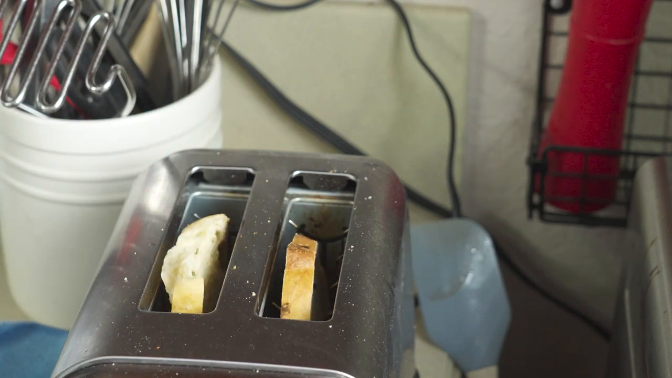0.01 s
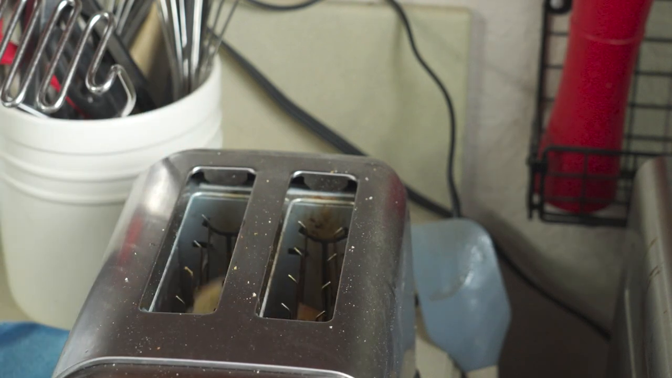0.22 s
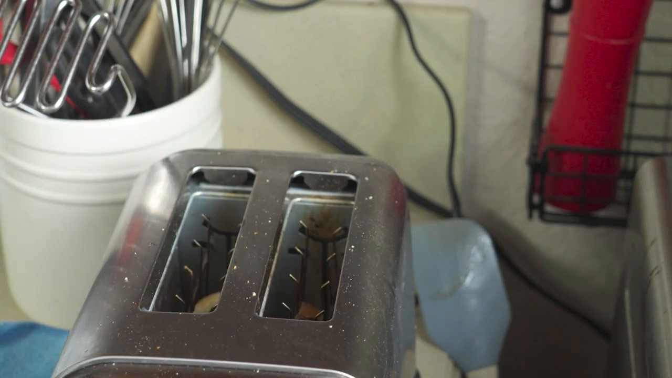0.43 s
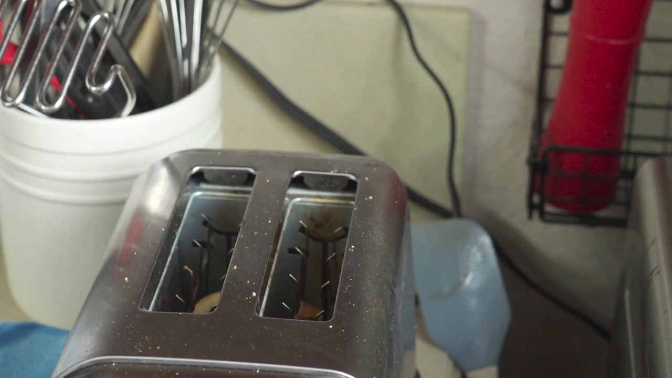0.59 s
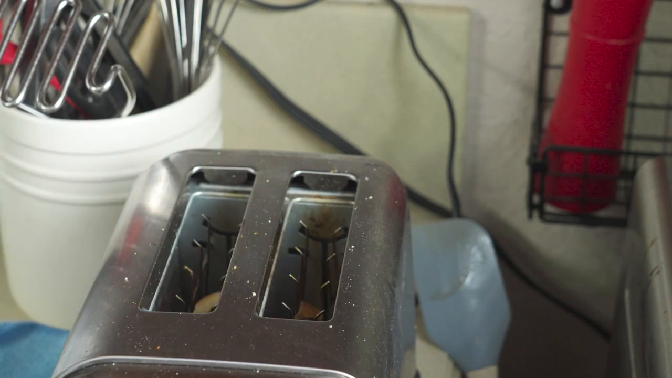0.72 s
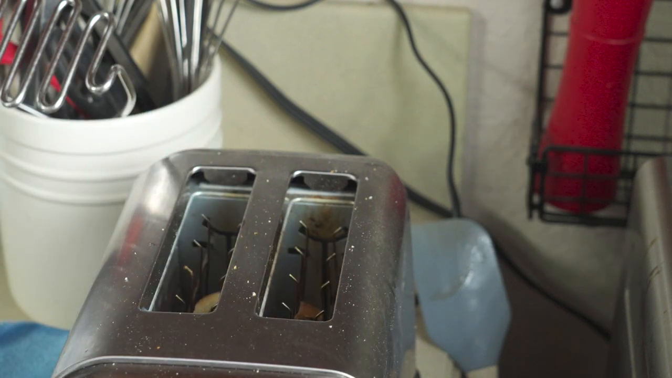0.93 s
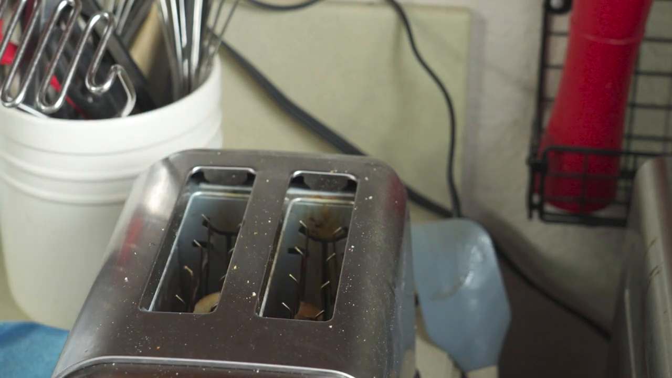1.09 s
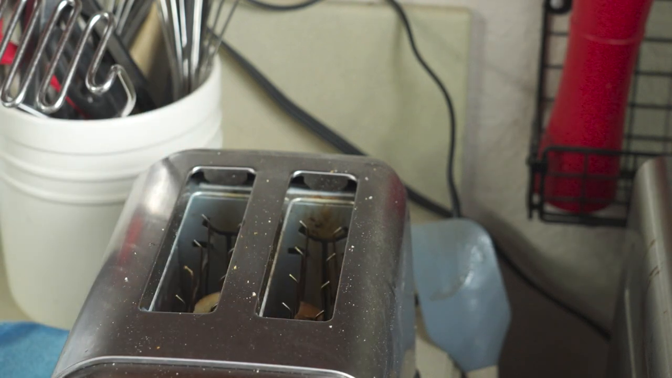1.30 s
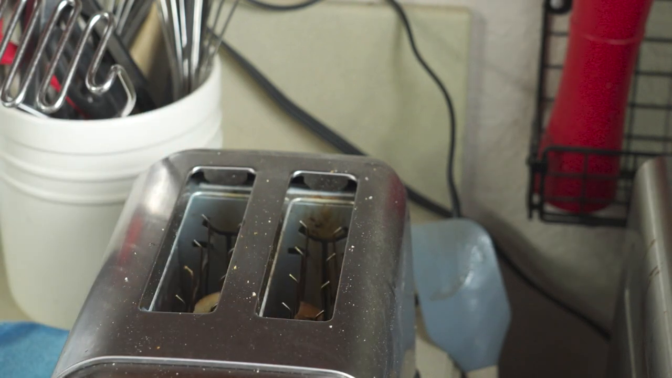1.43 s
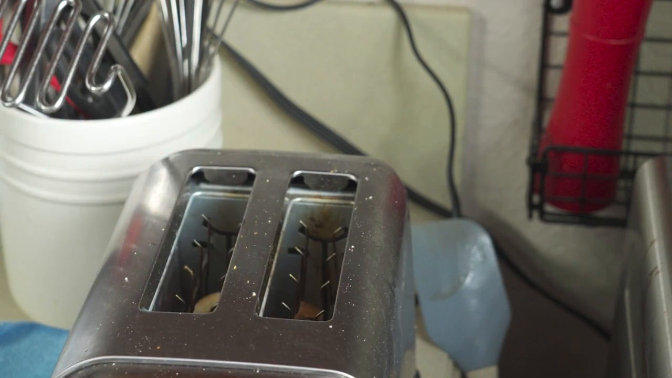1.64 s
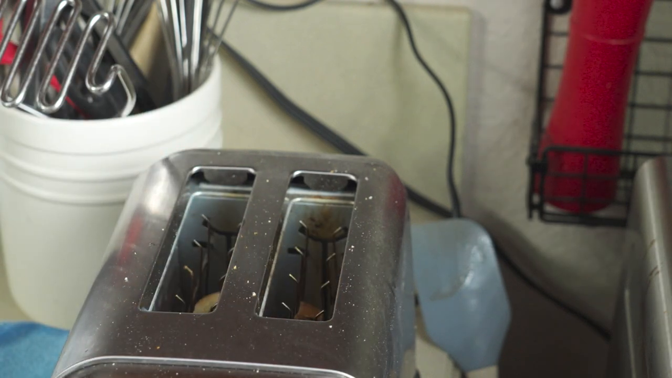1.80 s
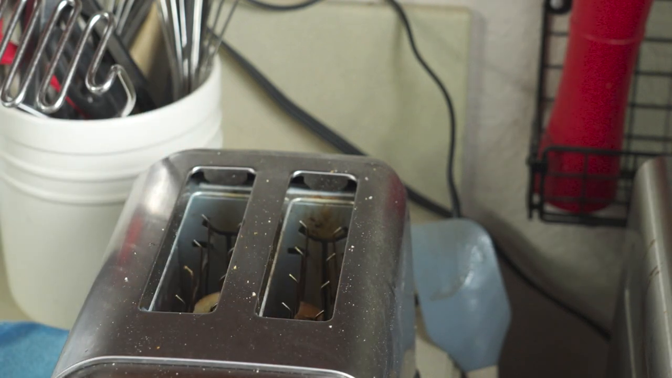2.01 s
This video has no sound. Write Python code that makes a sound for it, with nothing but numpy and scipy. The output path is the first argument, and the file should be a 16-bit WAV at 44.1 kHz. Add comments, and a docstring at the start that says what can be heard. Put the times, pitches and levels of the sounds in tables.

```python
"""Toaster lever pushed down

In a quiet kitchen the carriage rubs down its guide, scrapes past the catch and slams into
the end stop, rebounding twice: racks clatter, the steel case rings, the counter thuds.
Let go, the carriage settles on its latch with a light clack. Faint metal ticks follow,
with a rustle and small squeaks, over steady hiss, a wavering hum and soft low bumps."""
import sys
import numpy as np
from scipy import signal
from scipy.fft import rfft, irfft
from scipy.io import wavfile

SR = 44100
rng = np.random.default_rng(int(sys.argv[2]) if len(sys.argv) > 2 else 0)


def generate_wav(signal):
    """Clip the signal to [-1, 1] and save it as 16-bit WAV at the path in sys.argv[1]."""
    frames = np.transpose(np.atleast_2d(signal))
    scaled = np.clip(frames, -1, 1) * 32767
    pcm = np.round(scaled).astype(np.int16)
    wavfile.write(sys.argv[1], SR, pcm)


N = 90405
TIME_S = np.arange(N) / SR
BIN_HZ = np.arange(N // 2 + 1) * SR / N


def from_db(db):
    """Decibels to gain."""
    return 10 ** (np.asarray(db) / 20)


def at_hz(points, hz):
    """Interpolate (hz, value) rows on a log-frequency axis."""
    point_hz, values = np.transpose(points)
    return np.interp(np.log(np.maximum(hz, 1)), np.log(point_hz), values)


def envelope(rows):
    """Gain from (time_s, level_db) rows, silent outside them."""
    return from_db(np.interp(TIME_S, *np.transpose(rows), left=-200, right=-200))


def decay(t60_s):
    """Exponential fall, 60 dB in t60_s."""
    return np.exp(-np.log(1000) * TIME_S / t60_s)


def swell(rise_s):
    """Smooth onset."""
    return 1 - np.exp(-(TIME_S / rise_s) ** 2)


def start_at(start_s, x):
    """Delay x to start_s."""
    return np.pad(x, (int(start_s * SR), 0))[:N]


def unit_rms(x):
    """Scale to rms 1."""
    return x / np.sqrt(np.mean(x ** 2) + 1e-20)


def coloured(x, spectrum):
    """Filter x by a spectrum; rms 1."""
    return unit_rms(irfft(rfft(x) * from_db(at_hz(spectrum, BIN_HZ)), N))


def noise(spectrum):
    """Steady coloured noise; rms 1."""
    return coloured(rng.standard_normal(N), spectrum)


def friction(spectrum, slips_per_s, spread_db):
    """Dense, tiny slips at random times; rms 1."""
    sizes = from_db(spread_db * np.minimum(rng.exponential(1, N), 4))
    signs = rng.choice([-1, 1], N)
    slipping = rng.random(N) < slips_per_s / SR
    return coloured(sizes * signs * slipping, spectrum)


def ring(modes):
    """Struck modes: damped sines of alternating sign."""
    return sum((-1) ** k * from_db(db) * decay(t60_s) * np.sin(2 * np.pi * hz * TIME_S)
               for k, (hz, db, t60_s) in enumerate(modes))


# Background hiss: freq_hz, density_db
HISS_SPECTRUM = [(25, -4.5), (45, 9.5), (75, -4), (200, -7.5), (330, -3), (500, -2), (800, -4.5),
                 (1500, -3.5), (2400, -4), (3400, 0), (4300, -3), (5500, 1.5), (6500, -7.5), (7700, 0.5),
                 (8800, -13.5), (10700, -17.5), (12500, -11), (15500, -17)]
# Wavering of the hum: time_s, level_db
HUM_LEVELS = [(0, -82), (.9, -78), (1.05, -76.5), (1.3, -79.5), (1.5, -83.5), (1.7, -79), (2.05, -82)]


def background(hiss_db=-58.5, hum_hz=138):
    """Steady hiss and a low, wavering hum."""
    hum = np.sqrt(2) * envelope(HUM_LEVELS) * np.sin(2 * np.pi * hum_hz * TIME_S)
    return from_db(hiss_db) * noise(HISS_SPECTRUM) + hum


# Rubbing on the guide: time_s, level_db
SLIDE_LEVELS = [(0, -52), (.03, -50.5), (.06, -54.5), (.105, -61.5), (.15, -53.5), (.19, -60),
                (.225, -50.5), (.25, -66.5)]
# Guide friction: freq_hz, density_db
SLIDE_SPECTRUM = [(40, -14), (160, -1.5), (300, -6.5), (550, -5), (1100, -12), (3400, -13), (7500, -18.5),
                  (11000, -32.5), (16000, -29)]


def slide():
    """The carriage rubs down its guide in uneven slips."""
    return envelope(SLIDE_LEVELS) * friction(SLIDE_SPECTRUM, slips_per_s=1700, spread_db=1.5)


# Low bumps: start_s, level_db
LOW_BUMPS = [(.04, -62), (.58, -61), (1.189, -60.5), (1.63, -58)]


def bumps(pitch_hz=77.8, t60_s=0.26):
    """Soft bumps, each one damped bass tone."""
    return sum(start_at(start_s, swell(rise_s=0.011) * ring([(pitch_hz, db, t60_s)]))
               for start_s, db in LOW_BUMPS)


# Catch friction: freq_hz, density_db
CATCH_SPECTRUM = [(40, -18), (250, -6.5), (500, -6), (1200, -4), (2800, 0.5), (4500, -2), (7500, -7),
                  (10500, -17.5), (15000, -18.5)]


def catch(start_s=0.235, hold_s=0.013, fall_s=0.004, level_db=-28.5):
    """The carriage scrapes past the catch just before the stop."""
    pressure = swell(rise_s=0.0019) * np.exp(-np.maximum(TIME_S - hold_s, 0) / fall_s)
    scrape = friction(CATCH_SPECTRUM, slips_per_s=9000, spread_db=0)
    return start_at(start_s, from_db(level_db) * pressure * scrape)


# End-stop impact and two rebounds: start_s, gain_db
STOP_BLOWS = [(.2514, 3), (0.2551, -2.5), (0.2674, -7.5)]
# Wire racks and panels: freq_hz, density_db
CLATTER_SPECTRUM = [(50, -34), (140, -10), (340, -17), (480, -2.5), (800, -1.5), (1300, 0), (2000, -6.5),
                    (2700, 1), (3700, -3.5), (4500, -12), (5600, -3.5), (6400, -14.5), (7800, -11),
                    (10500, -22), (15000, -22.5)]


def end_stop(crack_hz=2100, crack_db=-12, clatter_db=-19):
    """Metal hits metal: each blow cracks, rattles the racks and excites the room."""
    crack = ring([(crack_hz, crack_db, 0.0025)])
    out = 0
    for start_s, gain_db in STOP_BLOWS:
        clatter = from_db(clatter_db) * decay(t60_s=0.072) * noise(CLATTER_SPECTRUM)
        out += start_at(start_s, from_db(gain_db) * (crack + clatter + kitchen_tail()))
    return out


# Kitchen reverberation: freq_hz, density_db
ROOM_SPECTRUM = [(35, -25), (70, -7.5), (150, -4), (340, -6.5), (480, -3), (750, -9.5), (1200, -4),
                 (1800, -4.5), (2800, -3), (3600, -2.5), (4600, -9.5), (5600, -7), (6400, -11.5),
                 (7800, -8.5), (10500, -21.5), (15000, -22.5)]
# Room decay by band: centre_hz, t60_s
ROOM_DECAY = [(80, 0.59), (300, 0.65), (900, 0.51), (3000, 0.37), (7000, 0.31), (14000, 0.29)]


def kitchen_tail(gain_db=-30):
    """Diffuse tail of one blow; the treble dies first."""
    spectrum = rfft(noise(ROOM_SPECTRUM))
    centres_hz, t60s = np.transpose(ROOM_DECAY)
    tail = 0
    for weights, t60_s in zip(np.eye(len(t60s)), t60s):
        band_gain = at_hz(np.c_[centres_hz, weights], BIN_HZ)
        tail += irfft(spectrum * band_gain, N) * decay(t60_s)
    return from_db(gain_db) * swell(rise_s=0.0058) * tail


# Steel case modes: pitch_hz, level_db, t60_s
STEEL_MODES = [(223.7, -38, .42), (254, -49.5, .45), (415.5, -39, 0.37), (431, -29, 0.25),
               (516, -37.5, 0.5), (578, -26.5, .26), (604, -40.5, 0.25), (655, -27.5, 0.19),
               (751, -37, 0.37), (804, -37.5, .36), (864, -35, .32), (921.4, -32, 0.27), (1103, -36, .33),
               (1308, -24.5, 0.23), (1550, -39, 0.28), (1615, -41, 0.28), (1696, -37, 0.27),
               (1941, -31.5, .25), (2278, -34, 0.25), (2378, -32, 0.3), (2476, -29.5, 0.15),
               (2782, -28, .22), (2855, -30, 0.21), (3005, -36, 0.36), (3148, -36, .25), (3390, -35, 0.15),
               (3610, -36.5, 0.27), (4264, -40, 0.2), (5000, -46, 0.47), (5700, -40.5, 0.38)]
# Counter modes: pitch_hz, level_db, t60_s
THUD_MODES = [(68, -45, .42), (82, -38.5, .42), (100, -40, .38), (122.7, -42, .3), (160, -38.5, .3)]


def case_and_counter():
    """The first blow rings the case and thuds through the counter below."""
    case = swell(rise_s=0.0016) * ring(STEEL_MODES)
    counter = swell(rise_s=0.011) * ring(THUD_MODES)
    return start_at(STOP_BLOWS[0][0], case + counter)


# Panel flexes: start_s, level_db
PANEL_KNOCKS = [(.2537, -4), (.2662, -10.5), (.4632, -32.5)]


def panel_knocks(pitch_hz=550, t60_s=0.017):
    """The panels flex as the weight arrives: hollow, quickly damped."""
    return sum(start_at(start_s, swell(rise_s=0.0022) * ring([(pitch_hz, db, t60_s)]))
               for start_s, db in PANEL_KNOCKS)


# Metal ticks: start_s, level_db, tilt_db_per_octave
METAL_TICKS = [(.4575, -48, 1), (.6560, -42, 1.5), (0.6897, -50, 0), (.7660, -48.5, -1), (.8980, -53, 1),
               (0.9128, -51, 0), (0.9265, -49, -1), (0.9994, -50, 0), (1.7163, -50, 1), (1.8462, -53, 2),
               (2.007, -43.5, -0.5)]
# Tick before tilt: freq_hz, density_db
TICK_SPECTRUM = [(400, -11.5), (1400, -9), (3100, -0.5), (4500, -2.5), (5700, -1), (7700, -2), (10000, -18),
                 (15000, -26)]


def metal_ticks(tail_db=-14.5):
    """Tiny snaps of the metal with short tails, some brighter than others."""
    shape = decay(t60_s=0.0043) + from_db(tail_db) * decay(t60_s=0.1)
    out = 0
    for start_s, level_db, tilt in METAL_TICKS:
        spectrum = [(hz, db + tilt * np.log2(hz)) for hz, db in TICK_SPECTRUM]
        out += start_at(start_s, from_db(level_db) * shape * noise(spectrum))
    return out


# Latch clack: freq_hz, density_db
LATCH_SPECTRUM = [(60, -3), (170, -0.5), (300, -4), (480, 3.5), (800, -3.5), (1200, -1.5), (1800, -1),
                  (2400, -6), (4500, -13), (5800, -10), (7500, -16), (11000, -26.5), (15000, -29)]
# Latch modes: pitch_hz, level_db, t60_s
LATCH_RING = [(503, -50, 0.4), (1380, -46, .012), (5840, -44.5, 0.028)]


def latch(start_s=0.4587, clack_db=-44.5, tail_db=-6):
    """The carriage settles on its latch: dull clack, small ping, lingering low ring."""
    shape = decay(t60_s=0.042) + from_db(tail_db) * decay(t60_s=0.54)
    clack = from_db(clack_db) * shape * noise(LATCH_SPECTRUM)
    return start_at(start_s, clack + ring(LATCH_RING))


# Rustle swells: time_s, level_db
RUSTLE_LEVELS = [(1.15, -75), (1.25, -57.5), (1.29, -64), (1.33, -70), (1.39, -60.5), (1.49, -58),
                 (1.56, -63.5), (1.75, -72), (1.89, -66.5), (2.04, -72)]
# Airy rustle: freq_hz, density_db
RUSTLE_SPECTRUM = [(200, -25), (800, -14), (1400, -4), (2200, -9), (4500, 1), (7500, 1.5), (10500, -7.5),
                   (14000, -4), (16000, -18)]


def rustle():
    """Faint, airy noise that comes and goes."""
    return envelope(RUSTLE_LEVELS) * noise(RUSTLE_SPECTRUM)


# Faint squeaks: start_s, length_s, pitch_hz, level_db
FAINT_SQUEAKS = [(1.241, .09, 1564, -64.5), (1.355, .17, 1406, -64), (1.863, 0.026, 1546, -58.5)]


def squeaks(roughness_hz=130, sag_hz_per_s=1600):
    """Falling tones, roughened by low-passed noise."""
    lowpass = signal.butter(2, roughness_hz, fs=SR, output="sos")
    out = 0
    for start_s, length_s, pitch_hz, level_db in FAINT_SQUEAKS:
        roughness = unit_rms(signal.sosfilt(lowpass, rng.standard_normal(N)))
        tone = np.sin(2 * np.pi * np.cumsum(pitch_hz - sag_hz_per_s * TIME_S) / SR)
        arch = np.sin(np.pi * np.minimum(TIME_S / length_s, 1))
        out += start_at(start_s, from_db(level_db) * arch * roughness * tone)
    return out


def scene():
    """The toaster on the counter, close by; mono."""
    lever = slide() + catch() + end_stop() + case_and_counter() + panel_knocks() + latch()
    return (background() + bumps() + lever + metal_ticks() + rustle() + squeaks())[None]


def record(dry, low_cut_hz=42, high_cut_hz=15800):
    """Gentle bass roll-off, steep top cut."""
    highpass = signal.butter(2, low_cut_hz, "high", fs=SR, output="sos")
    lowpass = signal.ellip(12, 0.1, 80, high_cut_hz, fs=SR, output="sos")
    return signal.sosfilt(lowpass, signal.sosfilt(highpass, dry))


dry = scene()
out = record(dry)
generate_wav(out)
```